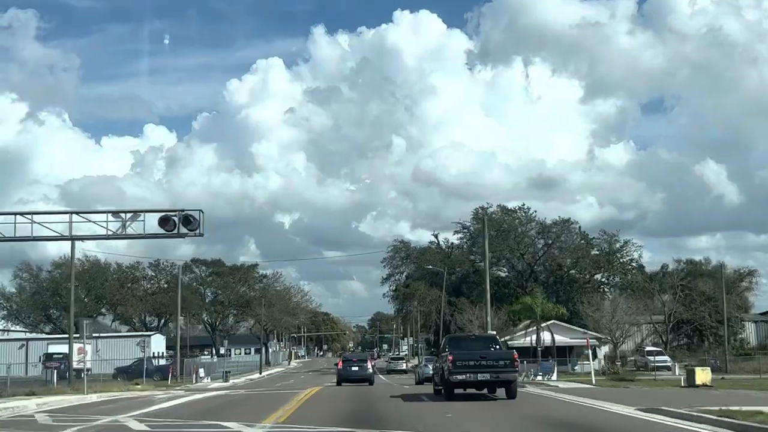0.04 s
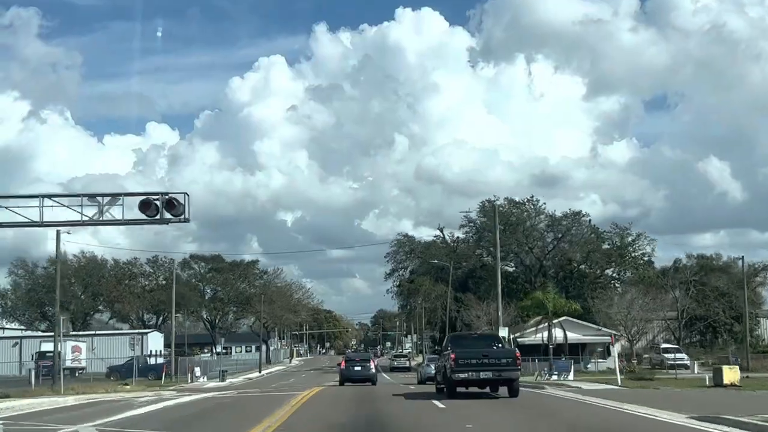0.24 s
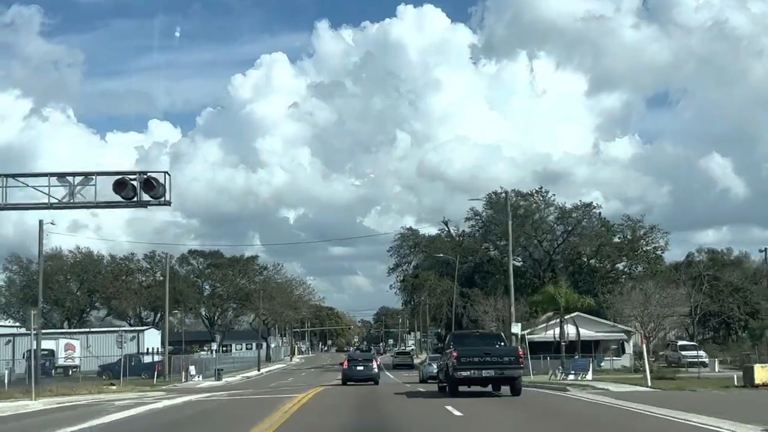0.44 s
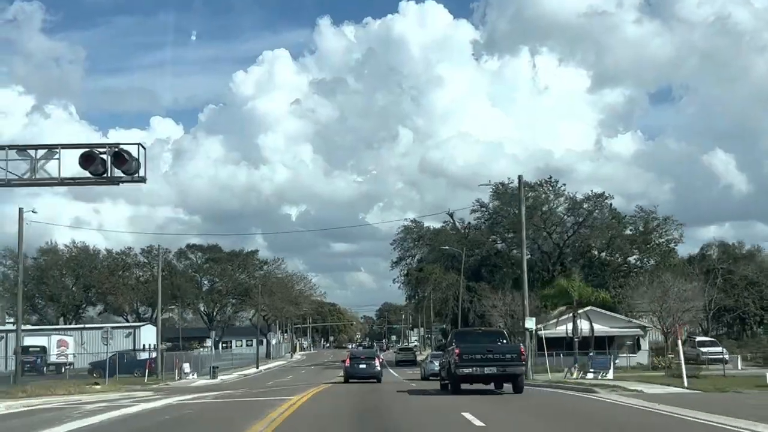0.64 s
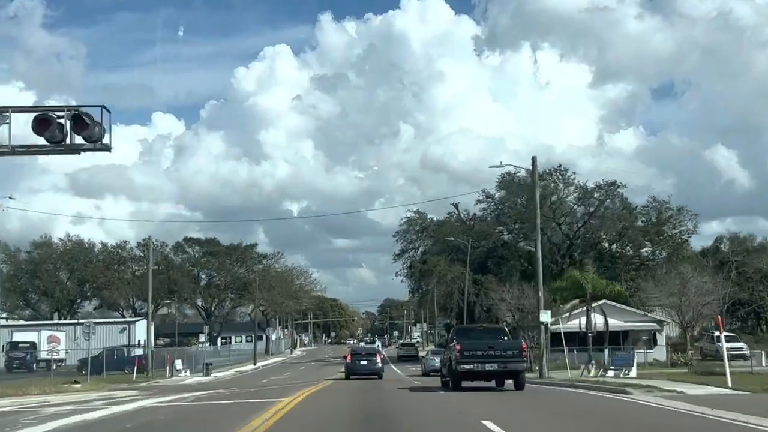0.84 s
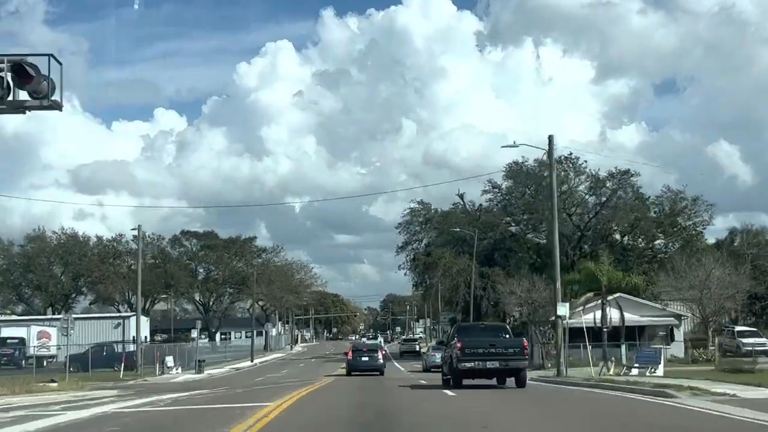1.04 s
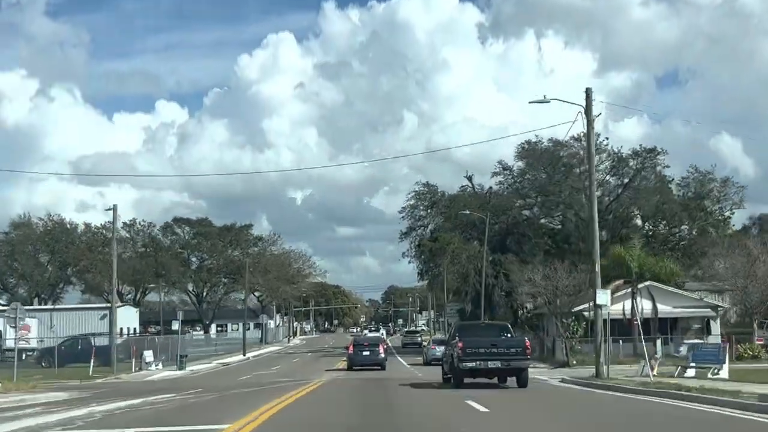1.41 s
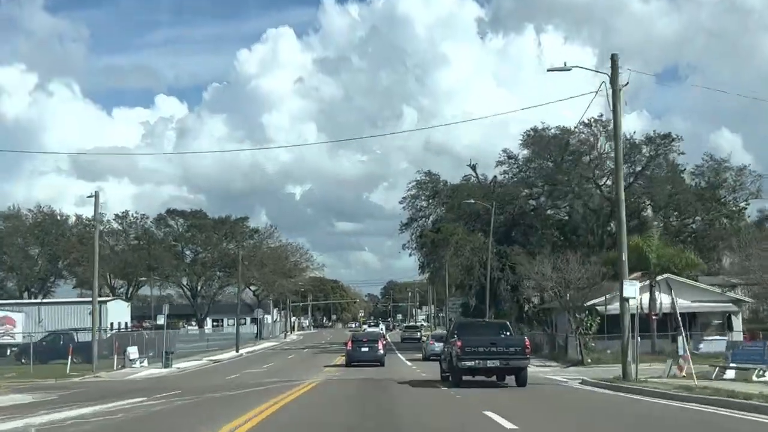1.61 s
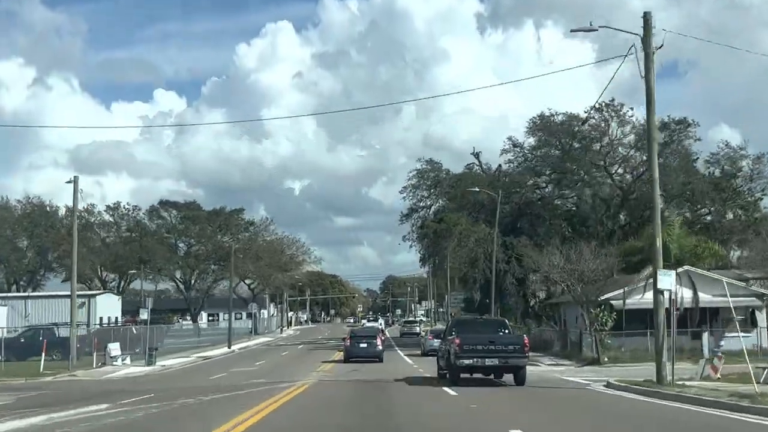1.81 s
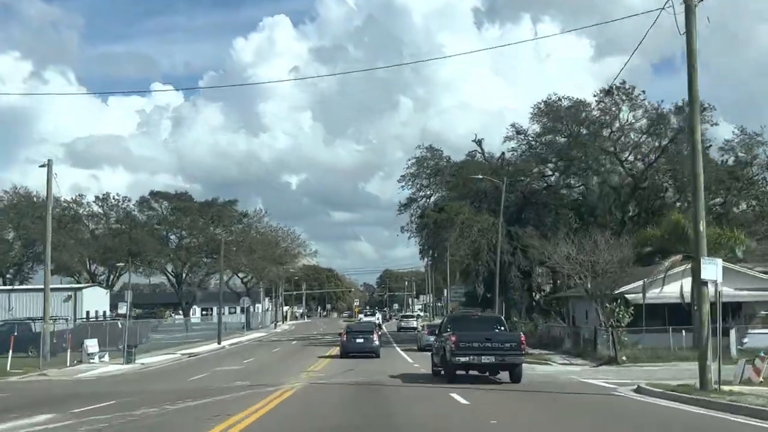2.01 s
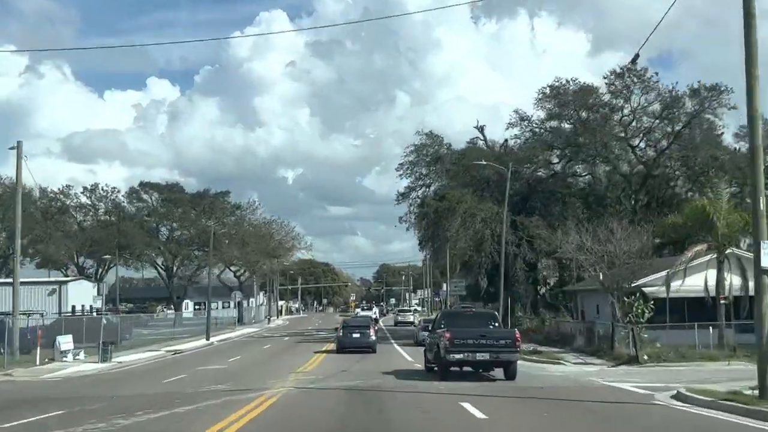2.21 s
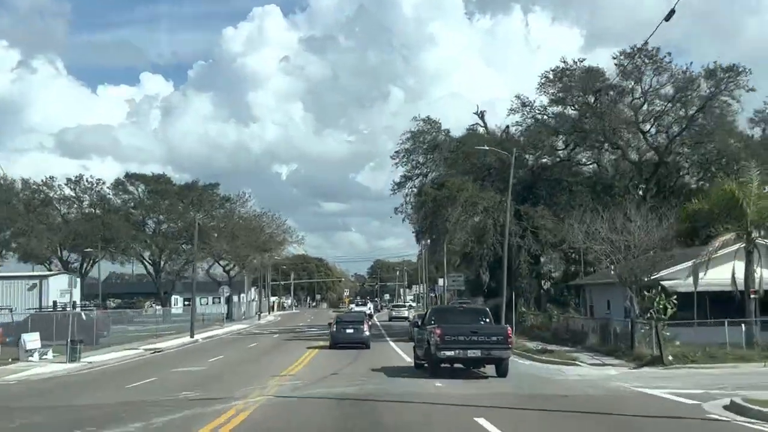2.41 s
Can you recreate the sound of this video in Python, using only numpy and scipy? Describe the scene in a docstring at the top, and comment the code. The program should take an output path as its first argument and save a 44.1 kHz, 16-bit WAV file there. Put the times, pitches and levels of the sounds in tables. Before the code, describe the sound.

Heard inside a moving car, deep road rumble swells into four quick, booming thuds as it crosses railway tracks. Loose panels chatter and a plastic part clicks, before the ride settles with a few faint squeaks and swishes.

```python
"""A car over a railroad crossing

Heard from inside, the tyres rumble steadily through the body. At the crossing four impacts thud through
the suspension and excite the cabin's lowest resonance. The shaken trim chatters, a panel knocks in its
modes and a loose plastic part clicks sharply. Faint ticks, swishes and squeaks follow on the road beyond.
"""
import sys
import numpy as np
from scipy import signal
from scipy.fft import rfft, irfft, next_fast_len
from scipy.io import wavfile
from scipy.ndimage import uniform_filter1d

SR = 44100
rng = np.random.default_rng(int(sys.argv[2]) if len(sys.argv) > 2 else 0)


def put_to_file(sound):
    """Save the sound as 16-bit audio at rate SR, in the file named by the first command-line argument."""
    columns = np.atleast_2d(sound).T  # one column per channel
    safe = np.clip(columns, -1, 1)
    whole_steps = np.round(safe * 32767)
    wavfile.write(sys.argv[1], SR, whole_steps.astype(np.int16))


N = 112454
TIME = np.arange(N) / SR


def from_db(db):
    """Amplitude ratio of a level: a factor of ten per 20 dB."""
    return 10 ** (np.asarray(db) / 20)


def unit_rms(x):
    """Normalisation to a root mean square of 1."""
    return x / np.sqrt(np.mean(x ** 2) + 1e-20)


def at_hz(table, hz):
    """Interpolation on a logarithmic frequency axis."""
    frequencies, values = np.transpose(table)
    return np.interp(np.log(hz), np.log(frequencies), values)


def over_time(table):
    """Linear interpolation in time."""
    return np.interp(TIME, *np.transpose(table))


def envelope(start, length, attack_s, t60_s):
    """Linear rise, hold until the length is over, then exponential decay by 60 dB in t60_s."""
    age = TIME - start
    return np.clip(age / attack_s, 0, 1) * from_db(-60 * np.maximum(age - length, 0) / t60_s)


def wander(span_s):
    """Random fluctuation of rms 1, correlated over about this span."""
    return unit_rms(uniform_filter1d(rng.standard_normal(N), int(span_s * SR)))


def evened(x, span_s):
    """Division by the running rms takes the swells out of a noise."""
    power = uniform_filter1d(np.mean(x ** 2, axis=0), int(span_s * SR))
    return x / np.sqrt(power + 1e-12)


def resonator(force, hz, t60_s):
    """Damped oscillator: a unit impulse starts a decaying sine of amplitude 1."""
    decay, angle = from_db(-60 / (t60_s * SR)), 2 * np.pi * hz / SR
    return signal.lfilter([0, np.sin(angle)], [1, -2 * decay * np.cos(angle), decay ** 2], force + 1e-18)


# Left-right coherence of the sound field: f/Hz, coherence
COHERENCE = [(50, 1), (170, 0.9), (350, 0.69), (700, 0.093), (1200, 0.8), (2000, 1), (5000, 0.97)]
# Excess of the left side over the right: f/Hz, level/dB
LEFT_EXCESS = [(60, .3), (170, -.5), (350, 1.7), (700, 2.1), (1500, 0)]

def noise(spectrum):
    """Partly coherent stereo noise of rms 1, in third octaves shaped by a relative spectral density."""
    out, run_in = 0, SR // 4
    edges_hz = 20 * 2 ** np.arange(0, 9.9, 1 / 3)
    white = rng.standard_normal((2, 2, N + run_in))
    for k, (low, high) in enumerate(zip(edges_hz, edges_hz[1:])):
        if high < spectrum[0][0] or low > spectrum[-1][0]:
            continue
        band = signal.butter(2, [low, high], "band", fs=SR, output="sos")
        mid, side = signal.sosfilt(band, white[k % 2])[:, run_in:]
        hz = np.sqrt(low * high)
        coherence = at_hz(COHERENCE, hz)
        pair = np.sqrt(1 + coherence) * mid + np.sqrt(1 - coherence) * np.array([side, -side])
        gain = from_db(at_hz(spectrum, hz) + at_hz(LEFT_EXCESS, hz) * np.array([[.5], [-.5]]))
        out += gain * pair
    return unit_rms(out)


# Roughness of the road: t/s, relative level/dB
ROUGHNESS = [(0, -33.5), (.19, -29), (.25, -26), (.39, -30.5), (.49, -23.5), (1.02, -18.5), (1.12, -24.5),
             (1.8, -29), (1.88, -27), (2.01, -27.5), (2.09, -32), (2.23, -27), (2.55, -32.5)]
# Course of the body's deep heave and of the tyres' drone on asphalt: t/s, level/dB
HEAVE_LEVEL = [(0, -27.5), (.2, -38.5), (.39, -22), (.55, -29.5), (1.1, -23.5), (1.28, -20.5), (1.5, -32),
               (1.85, -38.5), (2.1, -31), (2.3, -32.5), (2.45, -35)]
DRONE_LEVEL = [(0, -33), (.25, -38), (.55, -36.5), (1.2, -35.5), (1.6, -39), (1.76, -38), (2.0, -40.5),
               (2.25, -40), (2.55, -36.5)]
# Spectra of tyre rumble, heave, drone and the rush of tyres and air: f/Hz, level/dB
RUMBLE_SPECTRUM = [(40, -17), (55, -1.5), (75, 2), (100, -3), (130, -8), (175, -21.5), (230, -28),
                   (320, -28.5)]
HEAVE_SPECTRUM = [(22, -16), (30, -9), (42, 12), (56, -12)]
DRONE_SPECTRUM = [(125, -6.5), (175, 1.5), (230, -12), (330, -11), (450, -16)]
RUSH_SPECTRUM = [(130, 15.5), (175, 6), (240, 0.5), (300, -1), (400, 7), (500, 2), (650, -1.5), (850, 0.5),
                 (1150, -7.5), (1500, -12), (2100, -24), (4000, -40), (8000, -50), (13000, -35),
                 (16000, -44)]

def road(rumble_gain_db=2.5, smooth_road_db=-26, smooth_rush_db=-42.5, rush_slope=0.33):
    """Random forcing of tyres and body: the rumble follows the roughness fully, the rush only in part."""
    roughness_db = over_time(ROUGHNESS)
    rumble = from_db(roughness_db + rumble_gain_db) * evened(noise(RUMBLE_SPECTRUM), span_s=0.09)
    heave = from_db(over_time(HEAVE_LEVEL)) * evened(noise(HEAVE_SPECTRUM), span_s=0.11)
    drone = from_db(over_time(DRONE_LEVEL)) * evened(noise(DRONE_SPECTRUM), span_s=0.054)
    rush = from_db(smooth_rush_db + rush_slope * (roughness_db - smooth_road_db)) * noise(RUSH_SPECTRUM)
    return rumble + heave + drone + rush


# Slides of loose things in the cabin: t/s, duration/s, level/dB
SLIDES = [(1.157, .07, -69), (1.456, 0.24, -75.5), (1.818, 0.046, -71.5), (2.135, .035, -67.5),
          (2.347, 0.15, -78)]
# Spectrum of their friction: f/Hz, level/dB
SWISH_SPECTRUM = [(4000, -6), (7200, -3), (8800, -0.5), (12000, -7.5)]

def swishes():
    """Sliding friction radiates soft, high noise."""
    sliding = sum(from_db(db) * envelope(t, length, attack_s=0.018, t60_s=0.21)
                  for t, length, db in SLIDES)
    return sliding * noise(SWISH_SPECTRUM)


# Squeaks of rubbing parts: t/s, duration/s, f/Hz, level/dB
SQUEAKS = [(1.258, 0.04, 2680, -63), (1.3, .09, 7050, -77), (1.35, 0.14, 2840, -71),
           (1.49, 0.055, 2730, -66), (1.495, 0.06, 4150, -75), (2.31, 0.18, 2690, -70)]

def squeaks(arch_depth=.008, waver_depth=.006, flutter_db=4):
    """Stick-slip friction: thin tones waver and catch, their pitch rising a little and falling back."""
    out = 0
    for t, length, hz, db in SQUEAKS:
        arch = np.sin(np.pi * np.clip((TIME - t) / length, 0, 1)) - 2 / np.pi
        pitch_hz = hz * (1 + arch_depth * arch + waver_depth * wander(span_s=0.0046))
        tone = np.sin(2 * np.pi * np.cumsum(pitch_hz) / SR)
        grip = unit_rms(from_db(flutter_db * wander(span_s=0.014)))
        out += from_db(db) * grip * tone * envelope(t, length, attack_s=.02, t60_s=.1)
    return out


# Runs of chatter while the body shakes: t/s, duration/s, level/dB
CHATTER_RUNS = [(0.576, .012, -52), (0.590, 0.044, -47), (0.69, 0.32, -53), (0.868, 0.034, -44),
                (0.975, 0.026, -55.5), (1.033, 0.044, -54), (1.115, 0.01, -58), (1.263, 0.022, -57),
                (1.49, 0.11, -65.5), (1.895, 0.02, -61)]
# Spectrum of the trim's contacts: f/Hz, level/dB
CHATTER_SPECTRUM = [(600, 3.5), (1550, 2), (2000, 3.5), (2700, -5), (4000, -7.5), (5500, -8), (8500, -14.5),
                    (13000, -14), (16000, -26)]
# Modes of a loose panel, rung by chatter and knocks: f/Hz, relative level/dB, T60/s
PANEL_MODES = [(788, 2.5, 0.034), (1137, 0, 0.06), (1220, 3, 0.05), (1565, -6.5, 0.031), (1796, -5.5, 0.09),
               (2053, -9.5, 0.054), (2388, -11, 0.092), (2690, -5, 0.057), (2904, -6.5, 0.057),
               (3470, -11, 0.054), (3990, -13.5, 0.06), (4530, -18.5, 0.041), (6200, -16, 0.023)]

def chatter(contacts_per_s=2100, contact_s=0.0016, ring_db=-4.5, rustle_db=-71):
    """Shot noise: tiny random contacts in the trim each give a burst and keep the panel ringing."""
    sizes = from_db(-0.5 * np.minimum(rng.exponential(1, N), 4))
    contacts = sizes * (rng.random(N) < contacts_per_s / SR) * rng.choice([-1, 1], N)
    burst_energy = signal.lfilter([1], [1, -np.exp(-1 / (contact_s * SR))], contacts ** 2)
    panel = sum((-1) ** k * from_db(db) * resonator(contacts, hz, t60)
                for k, (hz, db, t60) in enumerate(PANEL_MODES))
    rustle = from_db(rustle_db + wander(span_s=0.05))  # the trim never quite settles
    runs = [from_db(db) * envelope(t, length, attack_s=0.0053, t60_s=0.25)
            for t, length, db in CHATTER_RUNS]
    shaking = np.sqrt(rustle ** 2 + np.sum(np.square(runs), axis=0))  # powers add
    bursts = unit_rms(np.sqrt(burst_energy)) * noise(CHATTER_SPECTRUM)
    return shaking * (bursts + from_db(ring_db) * unit_rms(panel))


# Knocks of the loose panel: t/s, level/dB
KNOCKS = [(.598, -53.5), (.624, -51), (.647, -46), (0.672, -51), (.8785, -31.5), (.912, -38.5),
          (0.984, -48), (1.008, -47), (1.031, -39.5), (1.063, -37)]
# Spectrum of the crack at contact: f/Hz, level/dB
CRACK_SPECTRUM = [(400, 12.5), (800, 15), (1300, -8.5), (2800, -3.5), (4500, -15.5), (8000, -28.5),
                  (15000, -22)]

def knocks(contact_s=0.0047, ring_db=-2.5, spread_db=1.5):
    """Impulse excitation: each knock cracks and strikes every panel mode with a strength of its own."""
    times, levels_db = np.transpose(KNOCKS)
    contacts = sum(from_db(db) * envelope(t, contact_s, attack_s=0.00065, t60_s=.035) for t, db in KNOCKS)
    out = contacts * evened(noise(CRACK_SPECTRUM), span_s=0.0029)
    for k, (hz, mode_db, t60) in enumerate(PANEL_MODES):
        scatter_db = rng.normal(0, spread_db, len(times))
        blows = np.zeros(N)
        blows[(times * SR).astype(int)] = from_db(levels_db + mode_db + ring_db + scatter_db)
        out += (-1) ** k * resonator(blows, hz, t60)
    return out


# Clicks of hard plastic: t/s, body level/dB, edge level/dB
CLICKS = [(.482, -60, -61), (0.862, -36.5, -34.5), (1.2045, -66, -60), (1.21, -63.5, -59.5),
          (1.493, -67, -57), (1.868, -79, -69), (1.902, -61.5, -65), (1.941, -68.5, -64)]
# Spectra of a click's body and bright edge: f/Hz, level/dB
CLICK_BODY_SPECTRUM = [(900, -25), (1500, -8.5), (2200, 6), (3500, 1), (5000, 0.5), (6500, -6.5),
                       (8000, -17.5)]
CLICK_EDGE_SPECTRUM = [(7500, -5.5), (9000, -11), (11500, -0.5), (14000, 1.5), (16000, -6)]

def clicks(contact_s=.002, attack_s=.0003, tail_db=-21):
    """A brief contact radiates a broadband snap; the cabin's reverberation adds a short tail."""
    body = evened(noise(CLICK_BODY_SPECTRUM), span_s=0.0021)
    edge = evened(noise(CLICK_EDGE_SPECTRUM), span_s=0.0031)
    out = 0
    for t, body_db, edge_db in CLICKS:
        snap = envelope(t, contact_s, attack_s, t60_s=.018)
        tail = from_db(tail_db) * envelope(t, contact_s, attack_s, t60_s=.12)
        out += (snap + tail) * (from_db(body_db) * body + from_db(edge_db) * edge)
    return out


# Tyres meeting the crossing's edges and rails: t/s, duration/s, boom level/dB, thud level/dB
TYRE_IMPACTS = [(0.568, 0.075, -14, -19), (0.694, 0.13, -8, -21), (0.892, 0.078, -6.5, -29),
                (1.015, 0.017, -6.5, -26.5)]
# Spectrum of the suspension's dull blow: f/Hz, level/dB
THUD_SPECTRUM = [(50, -24), (80, -4), (130, 8), (190, -7), (260, -9.5), (400, -20.5), (800, -32.5)]

def thumps(cabin_hz=42.02):
    """Cavity resonance: each impact swells the cabin's lowest mode and thuds through the suspension."""
    suspension = evened(noise(THUD_SPECTRUM), span_s=0.17)
    out = 0
    for t, length, boom_db, thud_db in TYRE_IMPACTS:
        boom = np.sin(2 * np.pi * cabin_hz * (TIME - t)) * envelope(t, length, attack_s=0.016, t60_s=0.19)
        thud = suspension * envelope(t, length, attack_s=0.032, t60_s=0.47)
        out += from_db(boom_db) * boom + from_db(thud_db) * thud
    return out


def scene():
    """Superposition of all sources at the front seat."""
    return road() + thumps() + chatter() + knocks() + clicks() + swishes() + squeaks()


# Lag of the left microphone port behind the right: f/Hz, phase/rad
PORT_LAG = [(7500, 0), (8700, 1), (9400, 3.0), (10900, 3.25), (11500, 4.4), (12500, 5.8), (14400, 6.7),
            (15500, 8.8)]

def record(dry, cutoff_hz=15600):
    """Phase dispersion: the left port delays the top octave; a steep low-pass limits both channels."""
    size = next_fast_len(N + SR // 10)
    bin_hz = np.arange(size // 2 + 1) * SR / size
    lag = np.interp(bin_hz, *np.transpose(PORT_LAG))
    left = irfft(rfft(dry[0], size) * np.exp(-1j * lag), size)[:N]
    low_pass = signal.ellip(10, .3, 80, cutoff_hz, fs=SR, output="sos")
    return signal.sosfilt(low_pass, np.array([left, dry[1]]))


dry = scene()
out = record(dry)
put_to_file(out)
```